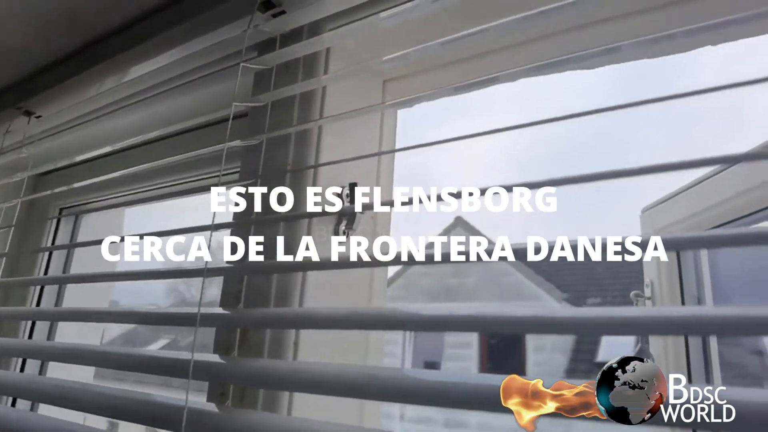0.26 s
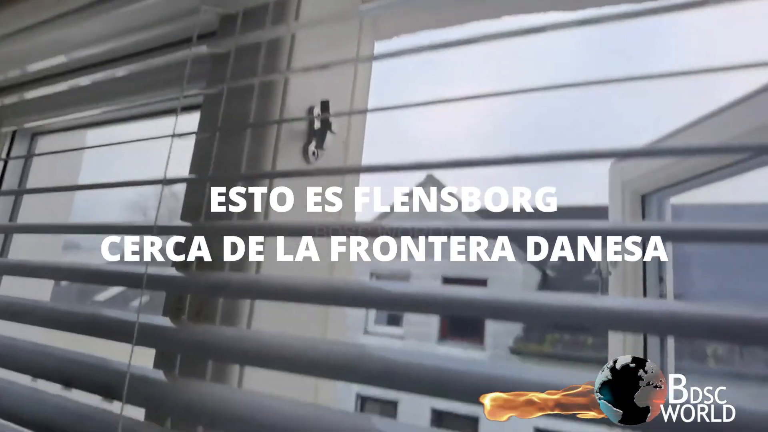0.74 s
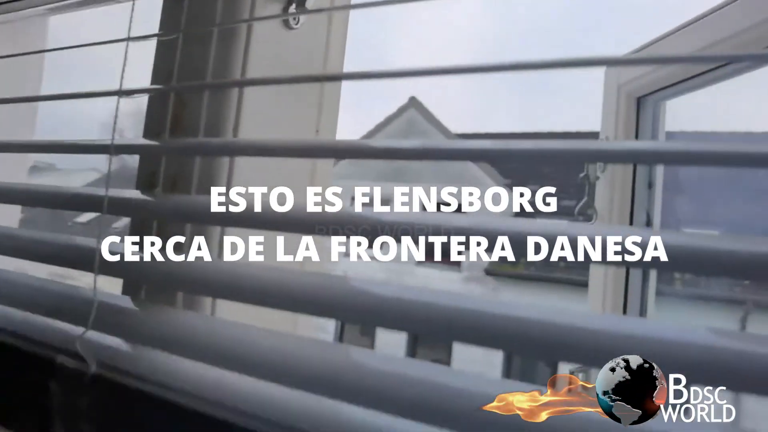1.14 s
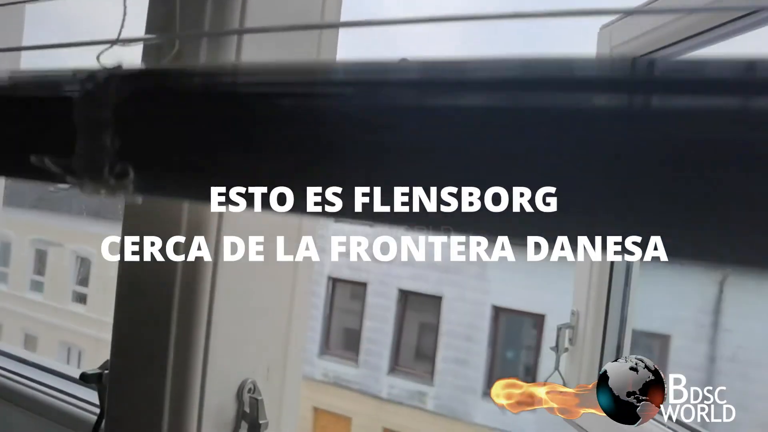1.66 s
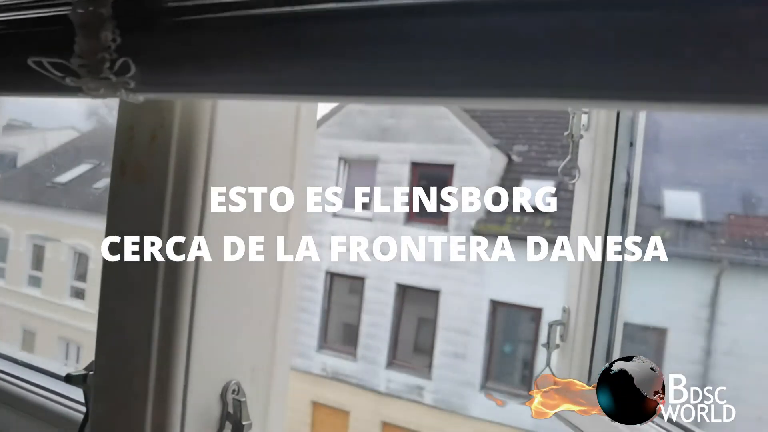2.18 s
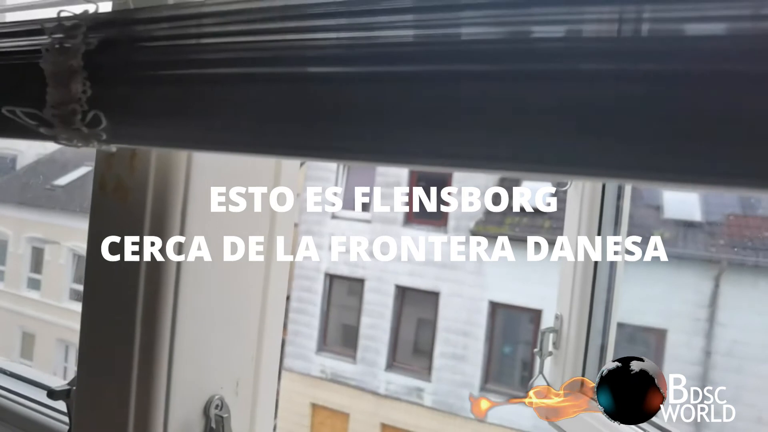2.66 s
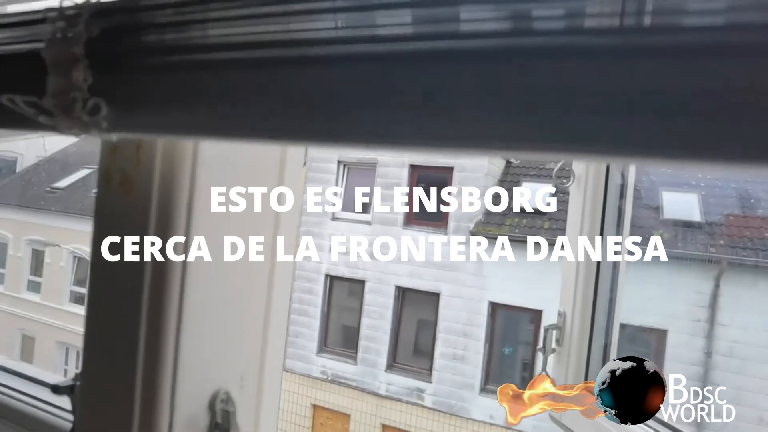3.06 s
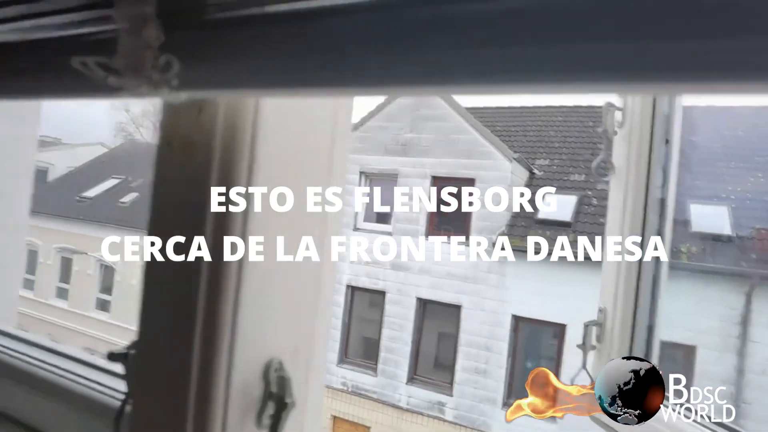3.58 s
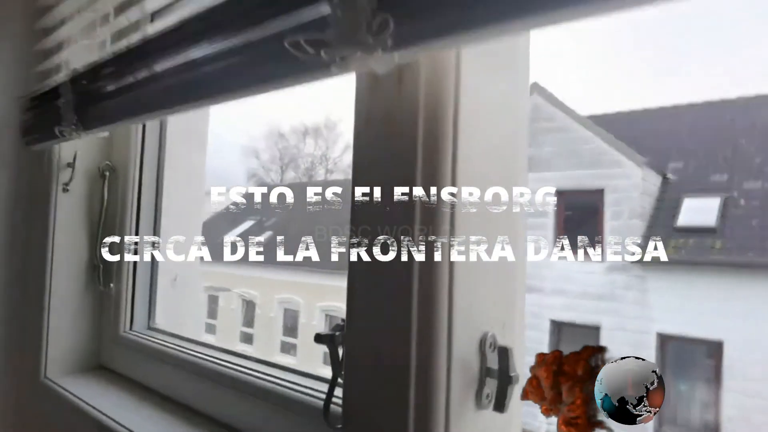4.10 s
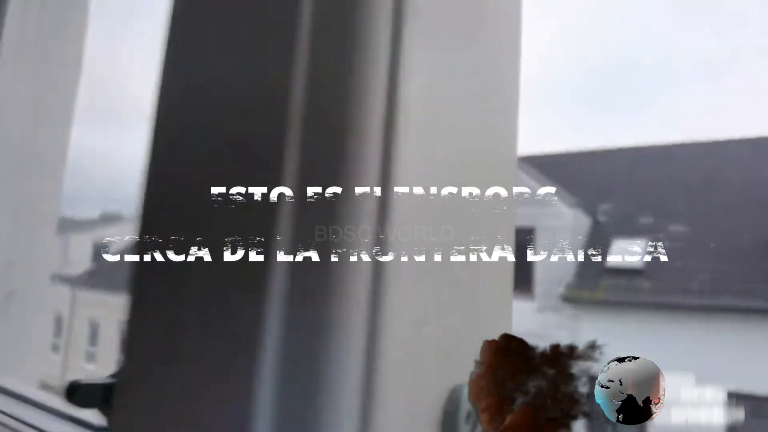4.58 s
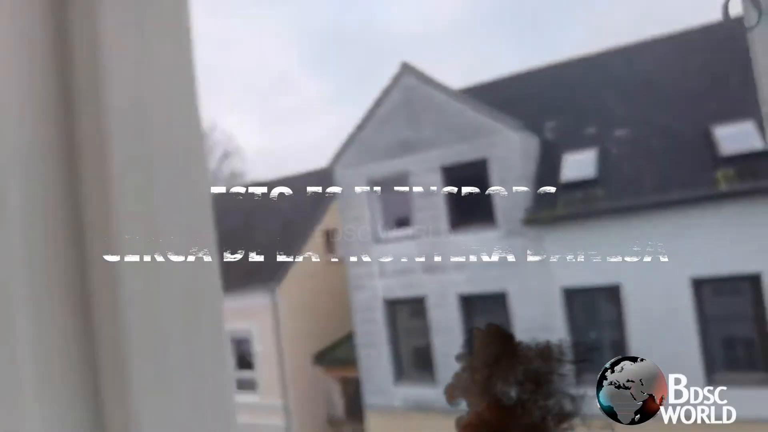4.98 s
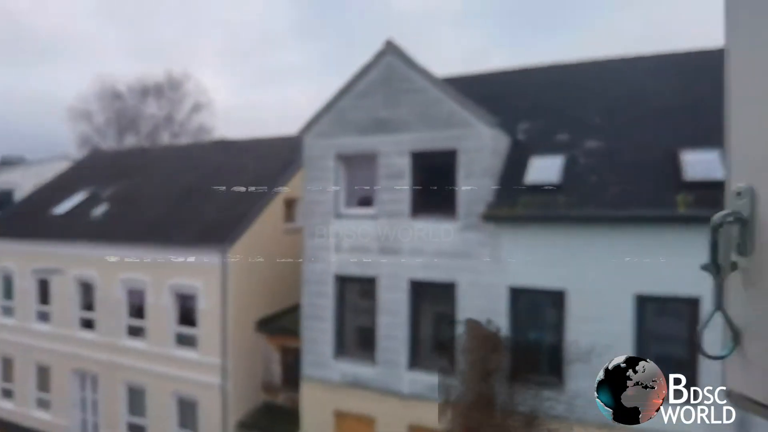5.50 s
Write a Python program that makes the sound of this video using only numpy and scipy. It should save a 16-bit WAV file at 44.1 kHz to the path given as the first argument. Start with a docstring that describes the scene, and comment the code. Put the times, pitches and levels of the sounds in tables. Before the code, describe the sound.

A small room beside an open window, heard closely in stereo, with a wavering low hum, distant street rumble and soft microphone hiss throughout. A faint click comes at 0.1 s and a sharper one at about 0.35 s, as blind slats begin a light, dry, fizzing rustle. It continues with scattered ticks until 1.6 s, then thickens into a bright, hard clatter from 1.75 to 1.9 s as the slats slam into a stack, with tiny high cord squeaks. The stack rattles briefly to rest by about 2.1 s. From 2.2 to 2.8 s, a rapid run of seven dull, boomy knocks passes through the building. Then it is mostly quiet, with very faint brushes and taps around 3 to 4 s. The hum swells towards the end; a cluster of roomier metallic fitting clicks comes at 5.3 s, then two heavier, lower knocks at 5.6 and 5.7 s.

```python
"""Slats rustle, gather and clatter into a stack as a venetian blind is pulled up at an open window.
The cord lock clicks, the cord squeaks, fittings click, and dull knocks come twice through the building.
Under it lie a low hum, street rumble and hiss. Slats are clouds of tiny noise grains; blows are short
noise bursts ringing tuned modes; knocks are soft tone bursts with a room boom.
A limiter ducks everything under the loudest blows."""
import sys
import numpy as np
from scipy import signal
from scipy.fft import rfft, irfft, next_fast_len
from scipy.io import wavfile
from scipy.ndimage import uniform_filter1d

SR = 44100
rng = np.random.default_rng(int(sys.argv[2]) if len(sys.argv) > 2 else 0)


def wav_record(signal):
    """Record a signal, one row per channel, as 16-bit PCM in the file named by sys.argv[1]."""
    frames = np.transpose(np.atleast_2d(signal))
    bounded = np.clip(frames, -1, 1)
    # unit amplitude maps onto the largest positive 16-bit level
    quanta = np.round(bounded * 32767).astype(np.int16)
    wavfile.write(sys.argv[1], SR, quanta)


N = 253420
TIME = np.arange(N) / SR   # s


def amp(db):
    """Decibels to gain."""
    return 10 ** (np.asarray(db) / 20)


def rms_one(x):
    """Scale to rms 1."""
    return x / np.sqrt(np.mean(x ** 2) + 1e-20)


def peak_one(x):
    """Scale so that the loudest four milliseconds have rms 1."""
    return x / np.sqrt(uniform_filter1d(np.mean(x ** 2, axis=0), size=176).max() + 1e-20)


def in_time(rows):
    """Draw the columns after the first as automation curves over the whole scene."""
    s, *columns = np.transpose(rows)
    return [np.interp(TIME, s, column) for column in columns]


def at_hz(points, hz):
    """Read a table on a log-frequency axis."""
    f, value = np.transpose(points)
    return np.interp(np.log(np.maximum(hz, 1)), np.log(f), value)


def add(out, s, sound):
    """Mix a sound in at a time."""
    start = max(round(s * SR), 0)
    part = sound[:, :max(N - start, 0)]
    out[:, start:start + part.shape[1]] += part


def noise(length, alike):
    """Stereo white noise with a given left-right correlation."""
    mid, side = rng.standard_normal((2, length))
    alike = np.clip(alike, 0, 1)
    return np.sqrt((1 + alike) / 2) * mid + np.sqrt((1 - alike) / 2) * side * [[1], [-1]]


def colour(x, spectrum):
    """Give a sound a spectrum that falls away beyond its ends; rms 1."""
    hz = np.linspace(1, SR / 2, x.shape[-1] // 2 + 1)
    low_end = 1 / (1 + (.8 * spectrum[0][0] / hz) ** 6)
    high_end = 1 / (1 + (.8 * hz / spectrum[-1][0]) ** 6)
    return rms_one(irfft(rfft(x) * amp(at_hz(spectrum, hz)) * low_end * high_end, x.shape[-1]))


def band(x, low_hz, high_hz, order=2):
    """Band-pass."""
    edges = [low_hz, min(high_hz, .45 * SR)]
    return signal.sosfilt(signal.butter(order, edges, "band", fs=SR, output="sos"), x)


def resonance(x, hz, width):
    """One two-pole resonance, gain 1 on top; a narrower width in Hz rings longer."""
    r = np.exp(-np.pi * width / SR)
    poles = [1, -2 * r * np.cos(2 * np.pi * hz / SR), r * r]
    return signal.lfilter(np.array([1, 0, -1]) * (1 - r * r) / 2, poles, x)


def through(x, response):
    """Convolve with a response of unit energy."""
    return signal.oaconvolve(x, rms_one(response) / np.sqrt(response.shape[1]), axes=1)[:, :N]


def left_late(x, lag_s):
    """Delay the left channel; a negative lag moves it ahead."""
    t = TIME[:x.shape[1]]
    return np.array([np.interp(t - lag_s, t, x[0]), x[1]])


# Reverberation time by pitch; columns: f/Hz, 60 dB decay/s
ROOM_DECAY = [(300, 0.25), (1500, 0.29), (5000, 0.29), (9000, 0.16), (15000, 0.016)]


def room(x, early_db, early_s):
    """Dense reflections: first from the window recess, then from the room, the top treble dying first."""
    t = TIME[:SR * 2 // 3]
    edges = np.geomspace(300, 18000, num=8)
    tail = 0
    for low_hz, high_hz in zip(edges, edges[1:]):
        t60 = at_hz(ROOM_DECAY, np.sqrt(low_hz * high_hz))
        tail = tail + band(noise(len(t), 0), low_hz, high_hz) * amp(-60 * t / t60)
    early = 1 + amp(early_db) * np.exp(-t / early_s)
    return through(x, tail * (t > .003) * early)


# Colour of the microphone hiss; columns: f/Hz, level/dB
HISS_COLOUR = [(1470, -22), (2500, -14.5), (3500, -16), (4300, -14.5), (5530, -10), (6540, -4.5),
               (7600, -7), (8400, -2.5), (9400, -0.5), (10300, -4), (11300, -13.5), (12000, -17),
               (12900, -8), (13700, -17), (14100, -26), (15500, -44)]
# Faint bands of brighter hiss; columns: f/Hz, width/Hz, level/dB
HISS_PEAKS = [(6600, 200, -15), (10350, 170, -18), (10870, 130, -15.5), (13000, 130, -27)]
# Fader of the hiss; columns: t/s, level/dB
HISS_FADER = [(0, -46.5), (2.3, -51.5), (3.3, -50), (4.45, -48), (5.1, -51.5), (5.75, -53.5)]


def hiss():
    """Microphone hiss wavers slightly as coloured noise; faint bands of brighter hiss swell and fade."""
    def waver(depth_db):
        """Slow random swings of gain."""
        return amp(depth_db * rms_one(band(rng.standard_normal(N), 1.0, 18, order=1)))

    peaks = 0
    for hz, width, db in HISS_PEAKS:
        peak = rms_one(resonance(noise(N, 0.22), hz, width))
        peaks = peaks + amp(db) * waver(depth_db=3.0) * peak
    bed = waver(depth_db=1.2) * colour(noise(N, 0.01), HISS_COLOUR)
    return amp(in_time(HISS_FADER)[0]) * (bed + peaks)


def drone(modes, steadiness):
    """Noise through very narrow resonances wavers as tones; swings in level are partly evened out."""
    out = 0
    for hz, width, db in modes:
        # an extra second in front lets the resonances build up
        narrow = resonance(resonance(rng.standard_normal(N + SR), hz, width), hz, width)
        tone = signal.hilbert(narrow, next_fast_len(N + SR))[SR:SR + N]
        out = out + amp(db) * rms_one(tone.real / np.abs(tone) ** np.clip(steadiness, 0, 1))
    return rms_one(out)


# Faders of the street; columns: t/s, drone level/dB, rumble level/dB (before a 5 dB lift)
STREET_FADERS = [(0, -36.5, -49), (.55, -33.5, -44), (.9, -35.5, -44.5), (1.3, -33, -47.5),
                 (2.1, -39.5, -54.5), (2.5, -33, -51), (3.4, -36.5, -45), (4.4, -38.5, -50),
                 (5.75, -38, -44.5)]
# Tones of the street drone; columns: f/Hz, width/Hz, level/dB
STREET_TONES = [(41.3, 5.6, -7), (49.8, 9.7, 0), (133.5, 4.7, -4), (149.58, 3.4, -1), (182.7, 16, -15)]
# Colour of the street rumble; columns: f/Hz, level/dB
RUMBLE_COLOUR = [(70, -10), (105, -13.5), (150, -9.5), (240, -13), (340, -15), (470, -27), (1100, -42.5),
                 (3500, -112)]
# Far street noise, sinking after the start and swelling again towards the end; columns: t/s, level/dB
OPEN_AIR_FADER = [(0, -52), (3.3, -57.5), (4.6, -58), (5.75, -51.5)]


def street():
    """Street sound: wavering low tones with bass noise, coloured rumble and mid-range noise from afar."""
    drone_db, rumble_db = in_time(STREET_FADERS)
    bass = rms_one(band(noise(N, 0), 29, 112))
    low_tones = amp(drone_db) * (drone(STREET_TONES, steadiness=0.25) + amp(-6.5) * bass)
    rumble = amp(rumble_db + 5.0) * colour(noise(N, 0.85), RUMBLE_COLOUR)
    air = amp(in_time(OPEN_AIR_FADER)[0]) * rms_one(band(noise(N, 0.033), 510, 2080))
    return low_tones + rumble + air


# Fader of the hum; columns: t/s, level/dB
HUM_FADER = [(0, -41.5), (.55, -35), (.9, -45), (1.15, -28), (2.1, -38.5), (3.2, -37), (4.1, -42.5),
             (5.0, -30.5), (5.75, -29)]
# Resonances of the hum; columns: f/Hz, width/Hz, level/dB
HUM_TONES = [(65.85, 5.5, -4), (80.5, 9.2, -15)]


def hum():
    """A low hum from two narrow resonances, their swings mostly evened out, riding its own fader."""
    return amp(in_time(HUM_FADER)[0]) * drone(HUM_TONES, steadiness=0.73)


# Dull knocks, about nine a second in each run; columns: t/s, level/dB, f/Hz, hardness/dB
KNOCKS = [(2.227, -17.5, 330, -4), (2.332, -16, 348, -13), (2.431, -16.5, 334, 4), (2.539, -17, 332, -2),
          (2.656, -15.5, 315, 5), (2.766, -19, 300, 8.5), (2.802, -21, 295, 0), (5.587, -11.5, 243, 0),
          (5.7, -11.5, 249, 4.5)]
# Upper resonances of the wall, woken by hardness; columns: f/Hz, level/dB
WALL_MODES = [(500, -19), (880, -36.5)]
# Colour of the wall's boom after a knock; columns: f/Hz, level/dB
BOOM_COLOUR = [(130, -6.5), (230, -1.5), (330, 3), (420, -7), (520, -10.5), (610, -23.5), (715, -31),
               (860, -24), (1080, -26), (1200, -33)]
# Returns of each knock from the walls; columns: delay/s, level/dB
KNOCK_ECHOES = [(0.0227, -15.5), (.036, -8.5), (.063, -7.5)]
# Modes in which the room rings on; columns: f/Hz, width/Hz, level/dB
ROOM_MODES = [(186, 10, 1), (221, 3.4, -1), (244.4, 10, -1.5), (319, 5.9, -7), (353, 6.2, -8.5),
              (384, 16, 2), (436, 18, -5)]


def knocks(boom_db, boom_t60, thud_s):
    """A soft blow of a few cycles echoes off the walls and booms; hardness wakes upper resonances."""
    out, t = np.zeros((2, N)), TIME[:SR]
    swell = (t / thud_s * np.exp(1 - t / thud_s)) ** 3
    upper = sum(amp(db) * np.sin(2 * np.pi * hz * t) for hz, db in WALL_MODES)
    boom_shape = (1 - np.exp(-t / 0.0084)) * amp(-60 * t / boom_t60)
    for s, db, hz, hardness_db in KNOCKS:
        start = s - .002
        thud = swell * (np.sin(2 * np.pi * hz * t) + amp(hardness_db) * upper) * np.ones((2, 1))
        # the boom's colour leans slightly with the pitch of the knock
        spectrum = np.array(BOOM_COLOUR) * [(hz / 320) ** 0.092, 1]
        boom = peak_one(colour(noise(len(t), 0.91), spectrum) * boom_shape)
        add(out, start, amp(db) * (thud + amp(boom_db) * boom))
        for delay, echo_db in KNOCK_ECHOES:
            add(out, start + delay, amp(db + echo_db) * thud)
    ringing = sum(amp(db) * resonance(out, hz, width) for hz, width, db in ROOM_MODES)
    return (out + ringing) * amp([[-.6], [.6]])   # slightly to the right


def struck(x, modes, spot_hz, focus_db):
    """Ring a set of modes; those near the pitch of the spot struck are favoured, by so many dB an octave."""
    out = 0
    for hz, width, db in modes:
        favour_db = -focus_db * abs(np.log2(hz / spot_hz))
        out = out + amp(db + favour_db) * peak_one(resonance(x, hz, width))
    return out


# Low modes of the rail; columns: f/Hz, width/Hz, level/dB
RAIL_MODES = [(614, 34, -10), (750, 63, 4.5), (840, 78, 9), (1070, 50, 6), (1210, 160, -13.5)]
# Colour of a struck edge; columns: f/Hz, level/dB
EDGE_COLOUR = [(3500, -4.5), (4500, -5), (5400, 2), (9200, 4.5), (10700, 5), (12000, -4), (15000, -6)]


def contacts(rows, body_modes, rings, impact, rise_s, body_alike, edge_alike, low_db, body_db, edge_db,
             rail_focus_db, ring_focus_db, lag_s):
    """Each blow is a sharp impact and dying chatter, driving low modes, body modes and bright edges."""
    out, t = np.zeros((2, N)), TIME[:SR // 5]
    for s, low, body, edge, rail_hz, body_hz, edge_hz, decay, pan, share, focus_db in rows:
        chatter = (1 - np.exp(-t / rise_s)) ** 2 * np.exp(-t / max(decay, 1e-3))
        touch = impact * np.linalg.norm(chatter) * signal.unit_impulse(len(t), np.argmax(chatter))
        soft = left_late(touch + chatter * noise(len(t), body_alike), lag_s)
        hard = chatter * colour(noise(len(t), edge_alike), EDGE_COLOUR)
        lows = band(struck(soft, RAIL_MODES, rail_hz, rail_focus_db), 400, 1560, order=3)
        bodies = band(struck(soft, body_modes, body_hz, focus_db), 1430, 3680, order=4)
        edges = peak_one(hard) + share * struck(hard, rings, edge_hz, ring_focus_db)
        parts = [(low + low_db, lows), (body + body_db, bodies), (edge + edge_db, edges)]
        blow = sum(amp(db) * peak_one(part) for db, part in parts)
        add(out, s - .0005, blow * amp([[pan / 2], [-pan / 2]]))
    return out


# Clicks of cord lock and window fittings, levels before the layer trims;
# columns: t/s, body level/dB, edge level/dB, body f/Hz, focus on that pitch/dB per octave, decay/s
CLICKS = [(0.1052, -18, -30.5, 1400, 18, 0.003), (0.343, -10, -9.5, 2680, 7.5, 0.0052),
          (2.514, -62, -34.5, 2620, 20, 0.0028), (3.611, -43, -39.5, 2960, 18, 0.021),
          (3.982, -69, -36, 2950, 37, 0.015), (5.099, -36.5, -47.5, 1660, 40, 0.0034),
          (5.268, -40, -28, 1910, 24, 0.0055), (5.273, -17.5, -13.5, 1700, 17, 0.0059),
          (5.287, -20, -47, 2220, 27, 0.00494), (5.305, -26.5, -35, 2300, 3, 0.003),
          (5.327, -38, -40, 1500, 11, 0.003), (5.412, -42.5, -46, 1990, 24, 0.0064),
          (5.661, -23.5, -45, 1710, 30, 0.0055), (5.701, -46, -60, 1900, 18, 0.0041)]
CLICK_LOW_DB, CLICK_LOW_HZ = -22, 1140   # low modes: level against the body, and pitch
CLICK_RING_HZ = 8000   # ring of the metal
# Soft taps of the hanging rail on the frame, before the layer trims; columns: t/s, level/dB, rail f/Hz
TAPS = [(2.49, -27, 910), (3.095, -35, 840), (3.731, -41, 900), (5.584, -31, 846)]
TAP_BODY_DB, TAP_EDGE_DB = -11.5, -13   # against the rail, before the layer trims
TAP_BODY_HZ, TAP_RING_HZ, TAP_DECAY_S = 2180, 5670, 0.00447
TAP_FOCUS_DB = 12   # per octave
# Body modes of the fittings; columns: f/Hz, width/Hz, level/dB
FITTING_MODES = [(1462, 53, 8.5), (1630, 71, 5.5), (1974, 106, 4), (2300, 88, 3), (2514, 70, 2),
                 (2930, 26, -1.5), (3340, 270, -2)]
# High rings of the metal; columns: f/Hz, width/Hz, level/dB
FITTING_RINGS = [(5660, 110, -2.5), (7150, 51, -1), (8340, 80, 1.5)]


def fittings(click_ring_share, tap_ring_share):
    """Hard clicks of metal and soft taps of the rail, each a short blow ringing the fittings' modes."""
    rows = []
    for s, body, edge, hz, focus, decay in CLICKS:
        rows.append((s, body + CLICK_LOW_DB, body, edge, CLICK_LOW_HZ, hz, CLICK_RING_HZ, decay, 0,
                     click_ring_share, focus))
    for s, db, hz in TAPS:
        rows.append((s, db, db + TAP_BODY_DB, db + TAP_EDGE_DB, hz, TAP_BODY_HZ, TAP_RING_HZ, TAP_DECAY_S, 0,
                     tap_ring_share, TAP_FOCUS_DB))
    return contacts(rows, FITTING_MODES, FITTING_RINGS, impact=0.43, rise_s=0.00192,
                    body_alike=0.22, edge_alike=0.09, low_db=-1.5, body_db=-0.5, edge_db=3.5,
                    rail_focus_db=46, ring_focus_db=17, lag_s=-0.00037)


# Squeaks of the cord; columns: t/s, length/s, f/Hz, level/dB
SQUEAKS = [(1.189, 0.072, 1072, -37.5), (1.81, 0.033, 9340, -13), (1.874, 0.029, 9485, -3.5),
           (3.979, 0.059, 6860, -33)]


def squeaks():
    """The cord sticks and slips on its pulley: a thin sine whose phase wanders at random."""
    out = np.zeros((2, N))
    for s, length, hz, db in SQUEAKS:
        t = TIME[:int(length * SR)]
        phase = 2 * np.pi * hz * t + 0.081 * np.cumsum(rng.standard_normal(len(t)))
        swell = np.sqrt(np.sin(np.pi * t / length))
        add(out, s, amp(db) * np.sin(phase) * swell * np.ones((2, 1)))
    return out


def slat_grains(per_s, spread_db, ring_db, alike, clump_db, count=2):
    """Tiny slips come in clumps; each is a dry tick that rings on briefly in its own slat's dense modes."""
    clumps = amp(clump_db * rms_one(band(rng.standard_normal(N), 2.7, 29, order=1)))
    hits = rng.random(N) < per_s / SR
    strengths = amp(spread_db * np.minimum(rng.exponential(1, N), 4))
    slips = hits * strengths * clumps * noise(N, alike)
    slat, t = rng.integers(0, count, N), TIME[:SR // 10]
    rings = 0
    for k in range(count):
        response = noise(len(t), 0.95) * np.exp(-t / 0.013)
        rings = rings + through(slips * (slat == k), response)
    return rms_one(slips + amp(ring_db) * rings)


# Speed of the pull, as the level of the rustle; columns: t/s, level/dB
PULL = [(0, -49), (.22, -42.5), (.38, -26), (.62, -26.5), (.95, -28.5), (1.27, -26), (1.38, -29.5),
        (1.58, -25), (1.74, -29.5), (1.87, -13)]
PULL_RELEASE_DB_PER_S = 196   # after the last point the slats come to rest
SLAT_BODY_DB, SLAT_BODY_TOP_DB = -1.5, -25.5   # drive of the bodies by the edges, and their ceiling


def slat_levels():
    """Gains of slat edges and bodies: both follow the pull, the bodies up to a soft ceiling."""
    pull_db, = in_time(PULL)
    edge = amp(pull_db - PULL_RELEASE_DB_PER_S * np.maximum(TIME - PULL[-1][0], 0))
    drive = (edge * amp(SLAT_BODY_DB - SLAT_BODY_TOP_DB)) ** 1.38
    return edge, amp(SLAT_BODY_TOP_DB) * np.tanh(drive)


# Hanging blind brushing the frame; columns: t/s, half length/s, body level/dB, edge level/dB, ring level/dB
BRUSHES = [(2.494, 0.075, -45, -48, -48), (3.68, 0.057, -49, -56, -64), (3.902, 0.051, -53.5, -48, -54),
           (4.017, 0.1, -57, -48.5, -41), (5.245, 0.15, -52, -62, -51.5), (5.586, 0.15, -54.5, -59, -53)]
BRUSH_RING_HZ, BRUSH_RING_WIDTH_HZ = 5910, 980   # a scraped slat sings
# Colour of the sliding slats; columns: f/Hz, level/dB
RUSTLE_COLOUR = [(320, -29), (550, -21.5), (975, -18.5), (1060, -10.5), (1220, -21), (1460, -6.5),
                 (1680, -8), (2020, -6.5), (2780, -5.5), (3070, -2.5), (4000, -13.5), (5750, -2.5),
                 (6430, -3), (8500, -1), (10200, 0.5), (12200, -11), (15500, -15)]
# Slat resonances; columns: f/Hz, width/Hz, level/dB
SLAT_MODES = [(1071, 8.7, -11), (1436, 25, -3.5), (2012, 62, 0.5), (2282, 56, 1.5), (2950, 180, -2.5),
              (5880, 100, -2), (8700, 200, 4.5)]
BLIND_LAG_S = .00018   # the slat bodies reach the left microphone later


def rustle():
    """Sliding slats: edges fizz, bodies rattle lower down, and a slat sings where it scrapes the frame."""
    edge, body = slat_levels()
    sing = 0
    for s, half, brush_body_db, brush_edge_db, brush_ring_db in BRUSHES:
        swell = np.exp(-((TIME - s) / half) ** 2)
        body = body + amp(brush_body_db) * swell
        edge = edge + amp(brush_edge_db) * swell
        sing = sing + amp(brush_ring_db) * swell ** 2
    slips = slat_grains(per_s=9000, spread_db=4.5, ring_db=6.5, alike=1.0, clump_db=0.05)
    flex = slat_grains(per_s=1500, spread_db=2.0, ring_db=9.5, alike=0.26, clump_db=0.5)
    # the cord catches in the slat holes
    ticks = amp(-19.0) * slat_grains(per_s=350, spread_db=-2.0, ring_db=3.0, alike=1.0, clump_db=0.5)
    modes = 0
    for hz, width, db in SLAT_MODES:
        modes = modes + amp(db) * rms_one(resonance(noise(N, 0.42), hz, width))
    modes = rms_one(modes)
    edges = band(colour(slips + ticks, RUSTLE_COLOUR) + amp(-12.0) * modes, 4280, 15500, order=4)
    bodies = band(colour(flex + ticks, RUSTLE_COLOUR) + amp(-10.0) * modes, 320, 4740, order=4)
    ring = noise(N, 0.091)
    for _ in range(2):   # twice through, for steeper sides
        ring = resonance(ring, BRUSH_RING_HZ, BRUSH_RING_WIDTH_HZ)
    return edge * rms_one(edges) + body * rms_one(left_late(bodies, BLIND_LAG_S)) + sing * rms_one(ring)


# Colour of the closed stack; columns: f/Hz, level/dB
STACK_COLOUR = [(440, -20), (530, 2), (620, -2.5), (740, 2.5), (850, -1), (950, -15), (1110, -5),
                (1350, -6), (1750, -2), (3000, -0.5), (3900, -8.5), (5000, 0), (6000, -0.5), (7500, -2),
                (9500, -5), (11000, -30)]
SHIVER_S, SHIVER_DB, SHIVER_RISE_S, SHIVER_DECAY_S = 1.9266, -11, 0.044, 0.041


def shiver():
    """The closed stack rattles to rest in many small contacts."""
    since = TIME - SHIVER_S
    grains = slat_grains(per_s=2900, spread_db=-3.0, ring_db=4.5, alike=0.3, clump_db=1.0)
    swell = np.exp(-np.maximum(since / SHIVER_DECAY_S, -since / SHIVER_RISE_S))
    return amp(SHIVER_DB) * swell * colour(grains, STACK_COLOUR)


# Slats clacking together, levels before the layer trims; columns: t/s, rail level/dB, body level/dB,
# edge level/dB, rail f/Hz, body f/Hz, edge ring f/Hz, decay/s, left over right/dB
CLACKS = [(.258, -60, -58, -32, 1050, 2200, 8800, 0.0044, 2),
          (.344, -26, -40, -14, 1100, 2500, 6900, 0.0028, -5),
          (.409, -55, -32, -19.5, 1050, 2190, 8600, 0.0025, 2),
          (.457, -52, -25.5, -42, 1050, 1490, 8800, 0.0076, -2),
          (.508, -48, -25.5, -35, 1050, 1500, 8800, 0.004, 3),
          (0.655, -50, -30, -17, 1050, 2200, 8200, 0.0071, 1),
          (1.253, -48, -49, -28, 1050, 2200, 8800, 0.0017, 5),
          (1.271, -51, -47, -19, 1050, 2200, 9100, 0.0027, 0),
          (1.323, -46, -33, -18, 1050, 2200, 9800, 0.0013, -4),
          (1.504, -50, -52, -19.5, 1050, 2190, 8800, 0.0023, -3),
          (1.544, -38, -50, -19, 1040, 2200, 9000, 0.0023, -11),
          (1.606, -26, -45, -15.5, 1210, 2000, 8540, 0.0017, -3.5),
          (1.62, -29, -40, -1, 1050, 2200, 9300, 0.00077, -0.5),
          (1.649, -24, -32, -14, 636, 2200, 6340, 0.0016, -3.5),
          (1.659, -25.5, -46, -34, 702, 2200, 8800, 0.0043, 1),
          (1.695, -37, -45, -17.5, 800, 2230, 9560, 0.0041, 1),
          (1.7495, -9.5, -10.5, -5, 770, 2600, 6900, 0.00344, -2),
          (1.763, -15, -42, -29, 860, 2400, 6900, 0.0025, -8.5),
          (1.779, -34, -52, -31, 770, 2200, 8800, 0.0017, 10),
          (1.793, -38, -28, -9.5, 640, 2000, 9600, 0.0025, 3),
          (1.803, -36, -9.5, 1.5, 1250, 1950, 9800, 0.0021, -5),
          (1.813, -27, -11.5, -3.5, 1300, 1750, 5470, 0.0028, 8),
          (1.822, -44, -27, -6, 1200, 2000, 4380, 0.00083, -4),
          (1.8303, -11, 0, 6.5, 740, 1940, 5200, 0.0026, 0.5),
          (1.871, -4.5, -1, 5.5, 1150, 2020, 9100, 0.0036, -.5),
          (1.900, -5.5, -9.5, -2.5, 1110, 1620, 6160, 0.0041, -1),
          (3.226, -60, -52, -42, 900, 2250, 8700, 0.0074, 8),
          (3.607, -58, -47, -32, 900, 2150, 9500, 0.0038, -1)]
# Body modes of the slats; columns: f/Hz, width/Hz, level/dB
BODY_MODES = [(1470, 120, 3), (1660, 93, 2.5), (1940, 230, 8), (2210, 240, -9.5), (2480, 90, 9),
              (2890, 260, 7)]
# High rings of the slats; columns: f/Hz, width/Hz, level/dB
SLAT_RINGS = [(4380, 350, 4), (5200, 140, 3), (6160, 190, -1), (6900, 260, -3), (8820, 56, 3),
              (9600, 140, -0.5)]


def clatter(ring_share, focus_db):
    """Slats strike each other on their bright edges and ring; the bottom rail adds weight."""
    rows = [(*clack, ring_share, focus_db) for clack in CLACKS]
    return contacts(rows, BODY_MODES, SLAT_RINGS, impact=0.43, rise_s=0.000783,
                    body_alike=0.61, edge_alike=0.38, low_db=-5, body_db=-2.5, edge_db=-1.0,
                    rail_focus_db=35.5, ring_focus_db=21.5, lag_s=0.00039)


def scene():
    """The blind close by, the fittings further off and so duller, the knocks behind the wall."""
    background = hum() + street() + hiss()
    wall = knocks(boom_db=-8.0, boom_t60=0.8, thud_s=0.0058)
    clicks = band(fittings(click_ring_share=0.38, tap_ring_share=0.93), 810, 8100, order=3)
    cord = squeaks()
    clacks = clatter(ring_share=0.57, focus_db=26)
    blind = (rustle() + shiver() + clacks + cord) * amp([[-.3], [.3]])
    # the microphone swings away towards the open window, so later clicks arrive with more room
    click_send = amp(np.interp(TIME, [0, 5], [-19, -7]))
    blind_room = amp(-7.0) * room(clacks + amp(2.0) * cord, early_db=13.5, early_s=0.0047)
    click_room = room(clicks * click_send, early_db=5.0, early_s=0.093)
    return background + wall + clicks + blind + blind_room + click_room


LIMIT_DB, LIMIT_SLOPE = -12.5, 0.8   # threshold; share of the excess taken off
LIMIT_RELEASE_DB_PER_S = 56


def limiter(x):
    """Looks a few milliseconds ahead, turns down at once and recovers slowly."""
    level_db = 10 * np.log10(np.abs(uniform_filter1d(np.mean(x ** 2, axis=0), size=176)) + 1e-12)
    wanted_cut_db = LIMIT_SLOPE * np.maximum(level_db - LIMIT_DB, 0)
    recovery = LIMIT_RELEASE_DB_PER_S * TIME
    # a running maximum on a rising ramp makes each cut fade at a constant rate
    cut_db = np.maximum.accumulate(wanted_cut_db + recovery) - recovery
    return x * amp(-uniform_filter1d(cut_db, size=88))


CUTOFF_HZ = 15750


def record(dry):
    """The limiter ducks the loudest blows, any peaks over full scale clip, and the top is cut."""
    top_cut = signal.ellip(12, .1, 80, CUTOFF_HZ, fs=SR, output="sos")
    return signal.sosfilt(top_cut, np.clip(limiter(dry), -1, 1))


dry = scene()
out = record(dry)
wav_record(out)
```